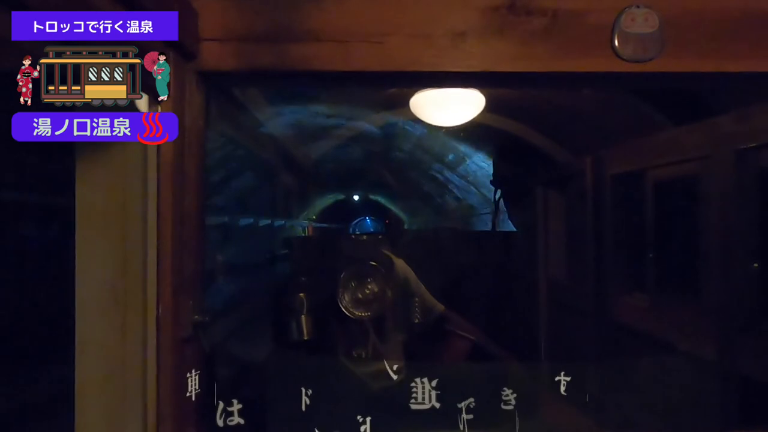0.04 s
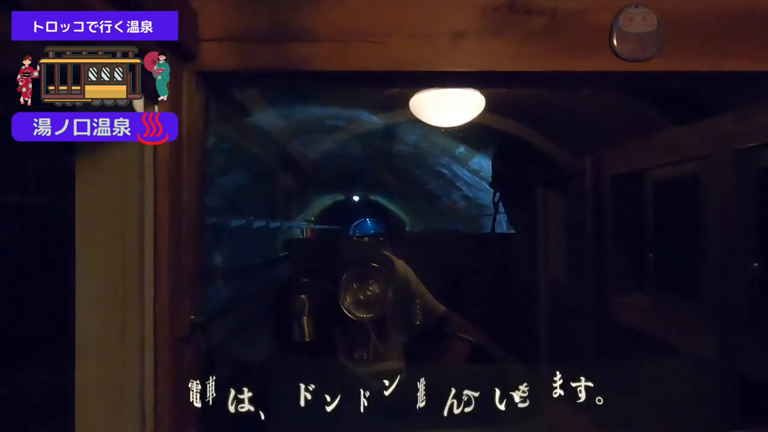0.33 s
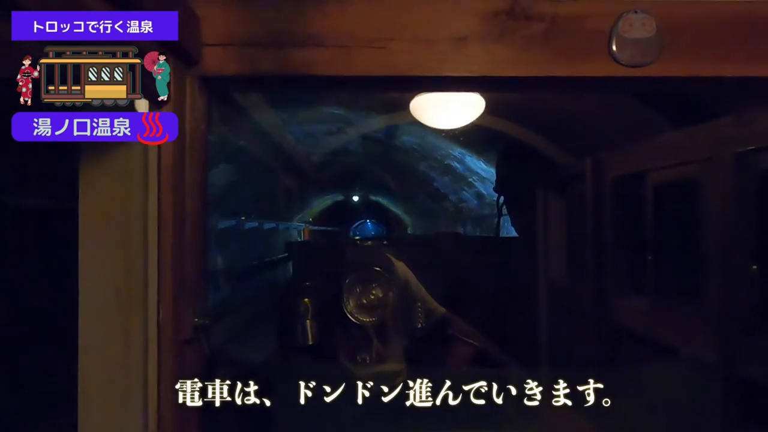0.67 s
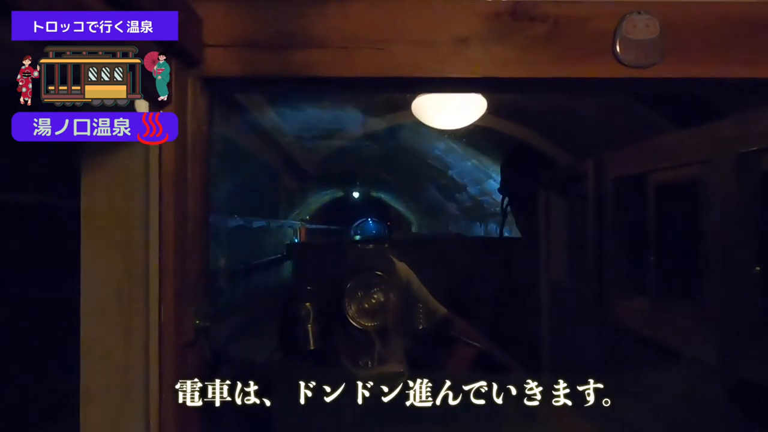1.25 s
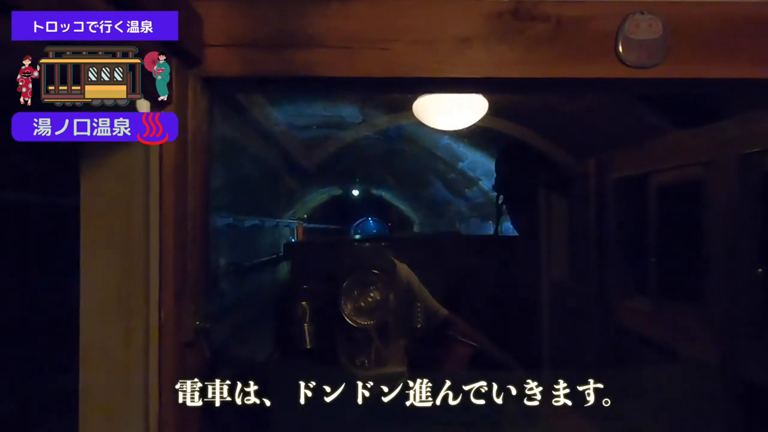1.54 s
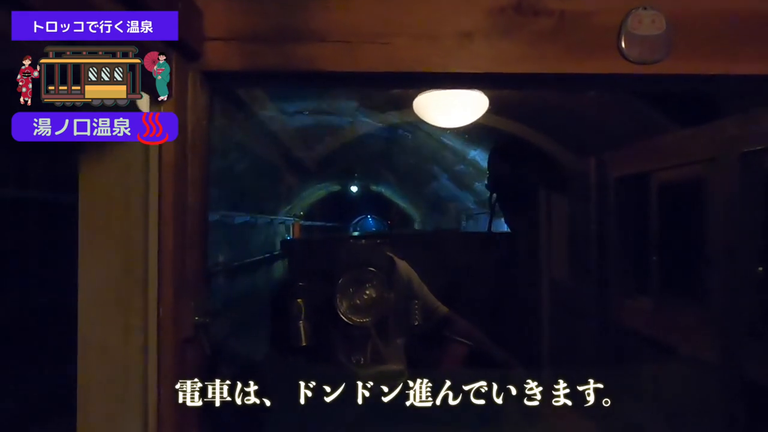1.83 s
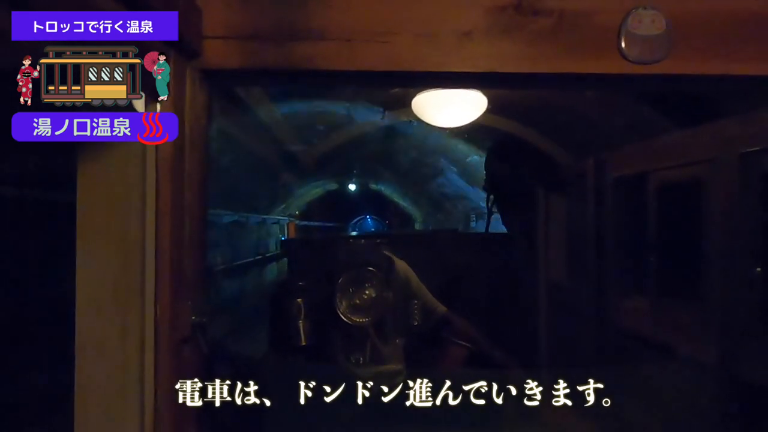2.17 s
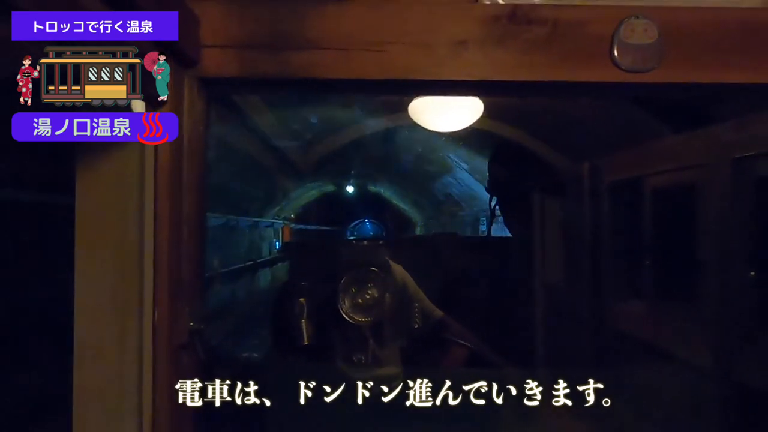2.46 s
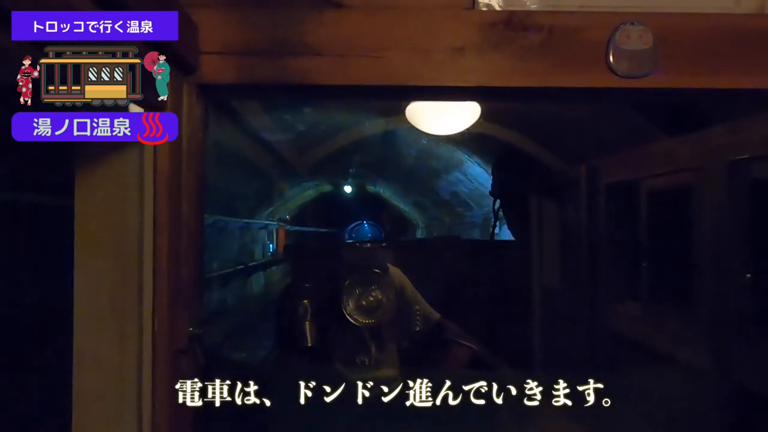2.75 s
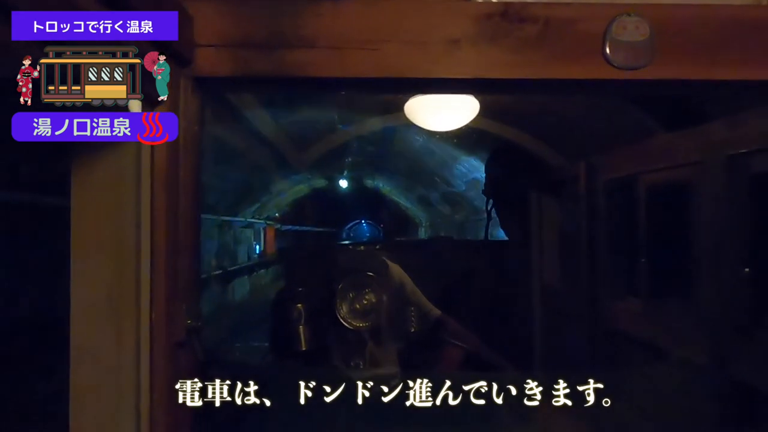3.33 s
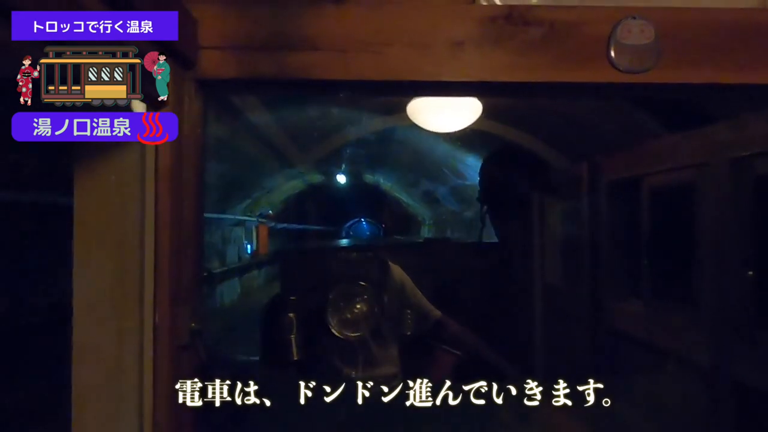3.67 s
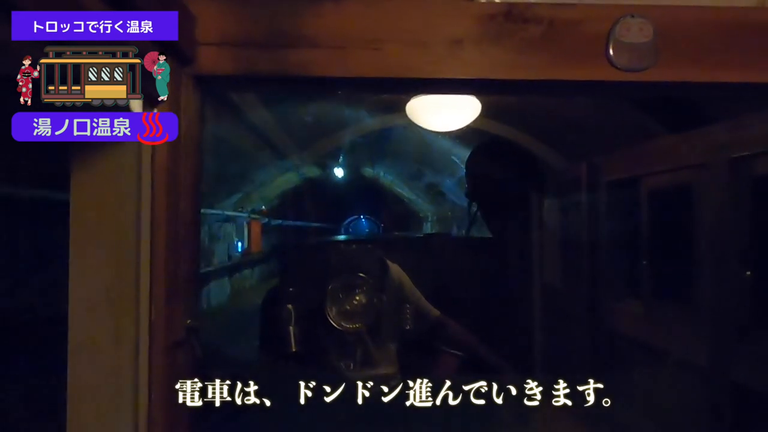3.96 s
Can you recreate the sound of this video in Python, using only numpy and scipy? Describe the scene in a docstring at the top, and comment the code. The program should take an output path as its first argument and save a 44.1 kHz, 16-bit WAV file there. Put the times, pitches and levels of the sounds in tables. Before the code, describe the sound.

Loud, low rail car rumble in a tunnel, with clacks, jolts and brief wheel scrapes.

```python
"""Inside a small wooden rail car rolling through a tunnel. From the start the track shakes the body into
a low boom, the wheels roar and grind, a flange scrapes, and loose fittings clack and chatter, each knock
smeared by cabin and tunnel. A second in, a steel part clinks and a jolt thumps through the floor. A loose
chain jingles and the flange rubs again around a second jolt. After a calmer stretch the heaviest jolt
lands near three seconds; jingles, scrapes and clacks crowd in, ending on the loudest clack."""
import sys
import numpy as np
from scipy import signal
from scipy.fft import rfft, irfft, next_fast_len
from scipy.io import wavfile
from scipy.ndimage import map_coordinates

SR = 44100
rng = np.random.default_rng(int(sys.argv[2]) if len(sys.argv) > 2 else 0)


def wrap_up_sound(samples):
    """Save the sound to the file named by the first command line argument, as 16-bit audio."""
    columns = np.atleast_2d(samples).T
    # keep every value between -1 and 1, then stretch to whole-number steps
    tamed = np.clip(columns, -1, 1)
    steps = np.round(tamed * 32767).astype(np.int16)
    wavfile.write(sys.argv[1], SR, steps)


N = 176400


def amp(db):
    """Decibels as a gain."""
    return 10 ** (np.asarray(db) / 20)


def unit(x):
    """Each channel scaled to rms 1."""
    return x / np.sqrt(np.mean(x ** 2, axis=-1, keepdims=True) + 1e-20)


def along(points, hz):
    """Read (freq_hz, value) points on a log frequency axis."""
    freqs, values = np.transpose(points)
    return np.interp(np.log(hz + 1), np.log(freqs + 1), values)


def curve(rows):
    """A fader ride: one value per sample from (time_s, value) rows."""
    return np.interp(np.arange(N) / SR, *np.transpose(rows))


def wobble(rate):
    """A smooth random curve, rate knots a second."""
    return map_coordinates(rng.standard_normal(int(N * rate / SR) + 4), [np.arange(N) * rate / SR])


def blow(start_s, attack_s, t60_s):
    """The envelope of something struck: a fast rise, then an exponential decay."""
    t = np.maximum(np.arange(N) / SR - start_s, 0)
    return (1 - np.exp(-t / attack_s)) * amp(-60 * t / t60_s)


def filtered(x, response):
    """Shape x with a complex response of frequency."""
    size = next_fast_len(N + SR // 2)
    return irfft(rfft(x, size) * response(np.fft.rfftfreq(size, 1 / SR)), size)[..., :N]


def coloured(x, points, size=8192):
    """A minimum-phase EQ: no ringing ahead of a hit, and white noise keeps its power."""
    cepstrum = irfft(np.log(amp(along(points, np.fft.rfftfreq(size, 1 / SR)))))
    cepstrum[1:size // 2] *= 2
    cepstrum[size // 2 + 1:] = 0
    impulse = irfft(np.exp(rfft(cepstrum)))
    return signal.fftconvolve(x, impulse[None] / np.linalg.norm(impulse), axes=1)[:, :N]


def noise(points):
    """A pair of coloured noises of rms 1."""
    return unit(coloured(rng.standard_normal((2, N)), points))


def resonance(hz, width_hz):
    """A pair of noises of rms 1 ringing in one narrow mode."""
    white = rng.standard_normal((2, N))
    return unit(filtered(white, lambda f: (2j * f * width_hz / (hz**2 - f**2 + 2j * f * width_hz)) ** 2))


def split(x, crossover_hz=5600):
    """The dull and the bright part of a knock."""
    bands = [signal.butter(3, crossover_hz, kind, fs=SR, output="sos") for kind in ("low", "high")]
    return [signal.sosfilt(band, x) for band in bands]


def body(modes_db=-15, rumble_db=-20.5, boom_above_hz=110, steadiness=0.35):
    """The track drives the car body's low resonances over a broad rumble."""
    # resonances of the body: pitch_hz, width_hz, level_db
    body_modes = [(37.7, 3, -5.5), (55.2, 16, -3.5), (80.7, 4.94, 1), (96.3, 10, -7.5), (131.1, 4.7, -1.5),
                  (147, 6.3, -1.5), (210.8, 16, -17.5), (231.9, 13, -12.5), (253.8, 17, -12)]
    # swell of the upper modes: time_s, drive (scaled to decibels about its mean below)
    boom_ride = [(0, -18.5), (.6, -16), (1.15, -16), (1.6, -18.5), (2.05, -17), (2.5, -20), (2.9, -20),
                 (3.1, -16), (3.35, -18.5), (3.7, -19), (3.9, -16)]
    # tone of the rumble: freq_hz, gain_db
    rumble_eq = [(15, -20.5), (26, -8.5), (31, -3.5), (100, 1), (175, -7), (230, -9), (290, -14.5),
                 (600, -36.5), (5000, -120)]
    drive = curve(boom_ride)
    swell_db = 1.4 * (drive - drive.mean())
    boom = np.zeros((2, N))
    for hz, width_hz, db in body_modes:
        mode = resonance(hz, width_hz)
        envelope = abs(signal.hilbert(mode)) + 0.078
        mode = unit(mode / envelope ** steadiness)  # gentle compression evens out the surges
        boom += mode * amp(db + (hz > boom_above_hz) * swell_db)
    return amp(modes_db) * unit(boom) + amp(rumble_db) * noise(rumble_eq)


def wheels():
    """The hollow roar of the wheels in the tunnel."""
    # tone of the roar: freq_hz, gain_db
    roar_eq = [(120, -29), (205, 2.5), (265, -2), (290, -4.5), (320, 4.5), (360, 0), (385, -2), (408, 2),
               (428, -0.5), (450, 4), (470, -1), (525, -5.5), (553, -3.5), (575, -5.5), (600, -7.5),
               (690, -17), (1000, -20.5), (8000, -110)]
    # rise and fall of the roar: time_s, level_db
    roar_ride = [(0, -20), (.25, -24), (1.2, -23.5), (1.86, -23), (1.93, -21), (2.12, -20), (2.22, -24),
                 (2.5, -21), (2.62, -24), (2.75, -20.5), (3.12, -20), (3.25, -25), (3.40, -23), (3.44, -19),
                 (3.49, -23.5), (3.6, -29), (3.66, -29), (4, -26.5)]
    return noise(roar_eq) * amp(curve(roar_ride))


def rails(grind_db=-1, ticks_db=-13, flutter_db=1.58):
    """Steel grinds on steel; rougher track also makes the small ticks louder."""
    # roughness of the track: time_s, level_db
    grind_ride = [(0.0, -21), (0.07, -33.5), (0.19, -29), (0.37, -37.5), (0.49, -35.5), (0.83, -33),
                  (1.22, -35), (1.46, -34.5), (1.69, -34), (2.07, -36.5), (2.34, -36), (3.01, -31.5),
                  (3.31, -31.5), (3.44, -31), (3.64, -31), (3.75, -33), (4.0, -31)]
    # tone of the grinding: freq_hz, gain_db
    grind_eq = [(300, -13.5), (700, 3.5), (1000, -1), (1500, -2), (2000, -5.5), (3000, -11.5),
                (4000, -19.5), (5500, -29), (7000, -34), (9500, -42.5), (11000, -47), (15000, -62.5)]
    roughness = amp(curve(grind_ride) + flutter_db * wobble(21.69))
    grind = amp(grind_db) * roughness * noise(grind_eq)
    return grind + amp(ticks_db) * rattle(roughness, taps_per_s=290, scatter_db=(-1, 0.44))


def thumps():
    """Heavy jolts of the carriage come through the floor as dull blows."""
    # jolts: start_s, level_db
    jolts = [(1.112, -24.5), (1.961, -19), (3.082, -16.5)]
    # tone of the floor: freq_hz, gain_db
    floor_eq = [(40, -19), (110, -5), (235, 6.5), (300, -19), (500, -31), (1200, -54.5), (6000, -120)]
    return noise(floor_eq) * sum(amp(db) * blow(s, attack_s=0.0029, t60_s=0.6) for s, db in jolts)


def jingles(shimmer_db=3, blur_rad=1.2):
    """The links of a loose chain touch and ring at a few blurred pitches."""
    # shakes of the chain: start_s, level_db
    shakes = [(1.44, -39.5), (1.79, -42), (3.0, -44), (3.32, -41), (3.39, -43), (3.632, -40)]
    # partials of the links: pitch_hz, level_db
    link_modes = [(2820, -2), (4620, 0), (4850, -5), (6950, -15)]
    t = np.arange(N) / SR
    ring = np.zeros((2, N))
    for channel in ring:
        for hz, db in link_modes:
            level = amp(db + shimmer_db * wobble(70))
            channel += level * np.sin(2 * np.pi * hz * t + blur_rad * wobble(280))
    return unit(ring) * sum(amp(db) * blow(s, attack_s=0.0052, t60_s=0.18) for s, db in shakes)


def clink(start_s=1.05, level_db=-30.5, attack_s=0.003):
    """A small steel part is struck once and rings briefly."""
    # partials of the steel part: pitch_hz, level_db, t60_s
    steel_modes = [(2778, 0, .3), (3370, -5, .12), (4560, -18, .3)]
    t = np.arange(N) / SR
    ring = np.zeros((2, N))
    for hz, db, t60_s in steel_modes:
        partial = np.sin(2 * np.pi * (hz * t + rng.random((2, 1))))
        ring += amp(db) * partial * blow(start_s, attack_s, t60_s)
    return amp(level_db) * ring


def scrapes(rough_db=0.5):
    """Short rough swells as a flange rubs the rail and sets the wheel ringing."""
    # rubs of the flange: peak_s, half_length_s, rasp_db, note_db
    rubs = [(0.058, 0.066, -34, -34.5), (1.538, 0.037, -30.5, -39.5), (1.817, 0.076, -32.5, -35),
            (2.045, 0.094, -42, -30), (3.274, 0.053, -29.5, -34), (3.448, 0.03, -35, -27.5),
            (3.611, 0.051, -30.5, -28)]
    # tone of the rasp: freq_hz, gain_db
    rasp_eq = [(350, -16), (600, 5), (1150, 4), (1450, 5), (2000, -3.5), (3000, -15.5), (14000, -95)]
    # modes of the wheel: pitch_hz, width_hz, level_db
    wheel_modes = [(538, 29, 1.5), (1147, 10, -9), (1320, 28, -18.5)]
    peak_s, half_length_s, rasp_db, note_db = np.transpose(rubs)
    swells = np.exp(-((np.arange(N)[:, None] / SR - peak_s) / half_length_s) ** 2)
    rasp = amp(rough_db * wobble(160)) * noise(rasp_eq)
    note = unit(sum(amp(db) * resonance(hz, width_hz) for hz, width_hz, db in wheel_modes))
    return swells @ amp(rasp_db) * rasp + swells @ amp(note_db) * note


def contact(t60_s, attack_s=0.0007, ring_db=-12, ring_t60_s=0.11, tail_db=-14, tail_t60_s=0.33):
    """One knock: a short crack, the fittings' ring and the cabin's tail."""
    # partials of the fittings: pitch_hz, level_db
    fitting_modes = [(1141, 3.5), (1440, 2.5), (1880, 3), (2106, -3), (2782, -3), (3190, -0.5), (3505, 0.5),
                     (4043, 1), (4373, 0.5), (4564, -1.5), (4866, 0)]
    t = np.arange(SR // 4) / SR
    hz, db = np.transpose(fitting_modes)
    gains = amp(db + rng.normal(0, 6.5, len(hz)))  # each knock favours different partials
    partials = np.sin(2 * np.pi * (hz[:, None] * t + rng.random((2, len(hz), 1))))
    ring = unit((gains[:, None] * partials).sum(1)) * amp(ring_db - 60 * t / ring_t60_s)
    decay = np.hypot(amp(-60 * t / t60_s), amp(tail_db - 60 * t / tail_t60_s))
    crack = rng.standard_normal((2, len(t))) * decay
    return (crack + ring) * (1 - np.exp(-t / attack_s))


def rattle(strength, taps_per_s, scatter_db, parts=6):
    """Several loose parts, each tapping at random moments with a knock of its own."""
    # tone of the taps: freq_hz, gain_db
    tap_eq = [(300, -21), (800, 1), (1500, 3.5), (2800, 0.5), (4500, -12), (5500, -17), (7000, -26.5),
              (9500, -33.5), (11500, -40), (15000, -50.5)]
    out = np.zeros((2, N))
    for _ in range(parts):
        hits = rng.random(N) < taps_per_s / parts / SR
        taps = unit(hits * amp(rng.uniform(*scatter_db, N))) * strength
        knock = contact(t60_s=0.075)
        out += signal.fftconvolve(taps[None], knock / np.linalg.norm(knock[0]), axes=1)[:, :N]
    return coloured(out / np.sqrt(parts), tap_eq)


def chatter(level_db=-3, release_s=0.015):
    """Each small jolt keeps the fittings tapping for a moment, some harder than others."""
    # bursts of chatter: start_s, length_s, level_db, treble_db
    flurries = [(0.028, .045, -27.5, 8), (0.102, 0.041, -25, 0), (0.357, 0.025, -30, -2),
                (0.616, .03, -34.5, 4), (0.669, 0.066, -32.5, -2), (1.043, 0.0079, -25.5, 1.5),
                (1.219, 0.016, -31.5, -1.5), (1.433, 0.028, -28, 3), (1.501, 0.085, -32, 0.5),
                (1.604, 0.03, -31, -3), (1.729, 0.022, -29.5, -2), (1.776, 0.085, -29, 0.5),
                (1.931, 0.023, -34.5, 4.5), (2.189, 0.044, -34.5, 0.5), (2.668, 0.038, -34.5, -5),
                (2.989, 0.02, -32.5, 4), (3.132, 0.057, -28.5, 1.5), (3.311, 0.046, -31.5, 2),
                (3.931, 0.036, -26.5, 4)]
    t = np.arange(N) / SR
    bursts = np.array([amp(db) * (t >= s) * np.exp(-np.maximum(t - s - length_s, 0) / release_s)
                       for s, length_s, db, _ in flurries])
    strength = bursts.sum(0)
    treble_db = np.array(flurries)[:, -1] @ bursts / (strength + 1e-20)  # louder bursts set the tone
    dull, bright = split(rattle(strength, taps_per_s=520, scatter_db=(-0.44, 1)))
    return amp(level_db) * (dull + amp(treble_db) * bright)


def clacks(bounce_s=0.0044, bounce_db=-10):
    """Sharp knocks of the loose fittings, brighter for a harder contact; each bounces once."""
    # knocks: start_s, level_db, treble_db
    knocks = [(0.047, -20.5, 6), (.109, -23.5, 2.5), (0.291, -29, -4), (.421, -29.5, -1.5),
              (0.522, -29.5, -6.5), (.688, -23, 1), (0.789, -25.5, -4.5), (.841, -37, 0), (.938, -22, -2),
              (1.101, -29.5, -7.5), (1.218, -28, 4.5), (1.53, -26.5, -0.5), (1.73, -30, 2),
              (1.804, -32.5, 3.5), (2.006, -26.5, 0), (2.104, -30.5, -3), (2.563, -25.5, -5.5),
              (2.856, -28, -6), (3.011, -31, 4.5), (3.135, -25.5, 5.5), (3.211, -26, -1),
              (3.396, -25.5, -2), (3.438, -25.5, 1.5), (3.504, -21, 5), (3.704, -27, 0), (3.806, -25, 2),
              (3.886, -21, 4.5), (3.951, -16, 4.5)]
    # tone of the clacks: freq_hz, gain_db
    clack_eq = [(200, -16), (700, 1), (1500, 8), (2500, 8), (4000, 2.5), (5500, -9.5), (7500, -17),
                (9500, -28.5), (11500, -39), (15000, -48.5)]
    out = np.zeros((2, N))
    for start_s, db, treble_db in knocks:
        for delay_s, loss_db in ((0, 0), (bounce_s * rng.uniform(0.5, 1.5), bounce_db)):
            dull, bright = split(contact(t60_s=0.041))
            knock = amp(db + loss_db) * (dull + amp(treble_db) * bright)
            onset = round((start_s + delay_s) * SR)
            out[:, onset:onset + knock.shape[1]] += knock[:, :N - onset]
    return coloured(out, clack_eq)


def spread(pair):
    """Two unrelated signals become left and right: mono bass, wider treble."""
    # stereo width: freq_hz, side_over_mid_db
    width_eq = [(30, -48), (80, -60.5), (170, -69), (280, -57), (500, -22.5), (1000, -17.5), (2000, -14),
                (4000, -8), (9000, -3)]
    side = filtered(pair[1], lambda hz: amp(along(width_eq, hz)))
    return np.array([pair[0] + side, pair[0] - side])


def scene():
    """The rolling bed and the loose parts on top of it, spread into stereo."""
    rolling = body() + thumps() + wheels() + rails() + scrapes()
    return spread(rolling + clacks() + chatter() + jingles() + clink())


def record(dry, top_hz=14500):
    """The microphone leans a little to the left and keeps nothing above its band limit."""
    # stereo balance: freq_hz, left_minus_right_db
    lean = [(170, 0), (500, .7), (1000, 1.3), (4000, .9), (8000, .1)]
    sides = np.array([[0.5], [-0.5]])
    return filtered(dry, lambda hz: amp(along(lean, hz) * sides) * (hz < top_hz))


dry = scene()
out = record(dry)
wrap_up_sound(out)
```